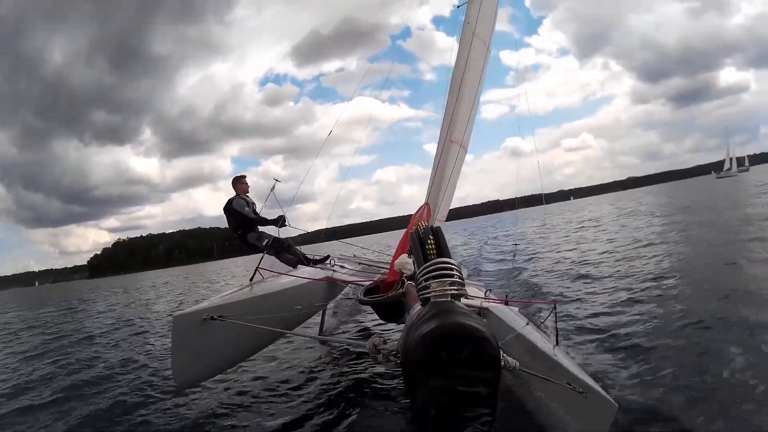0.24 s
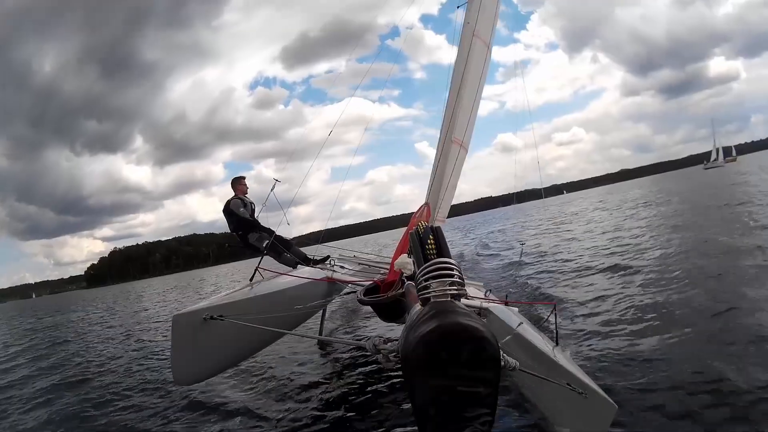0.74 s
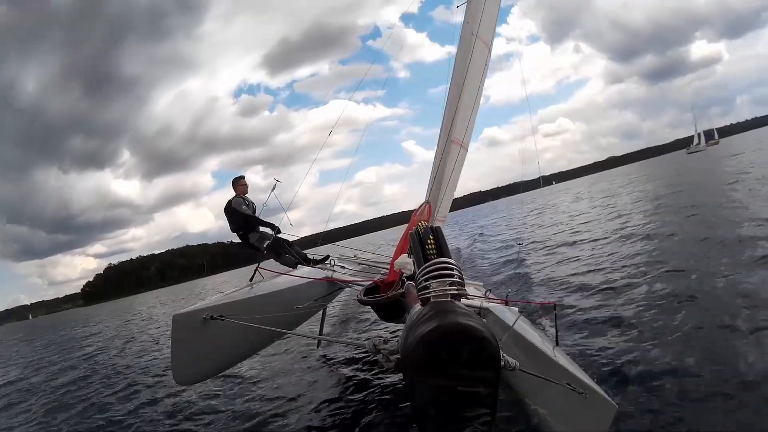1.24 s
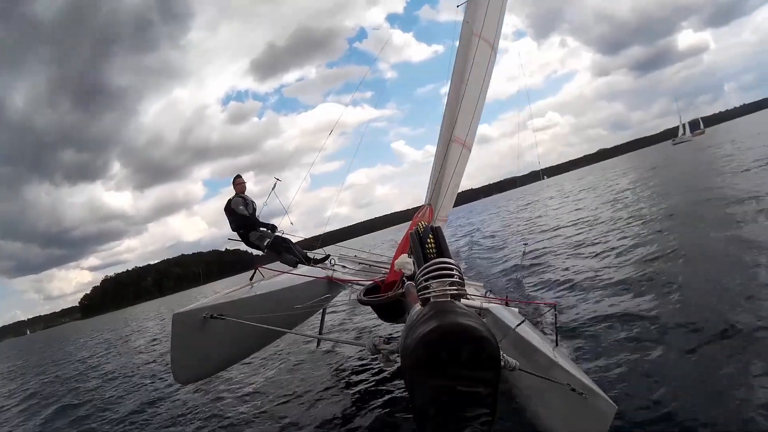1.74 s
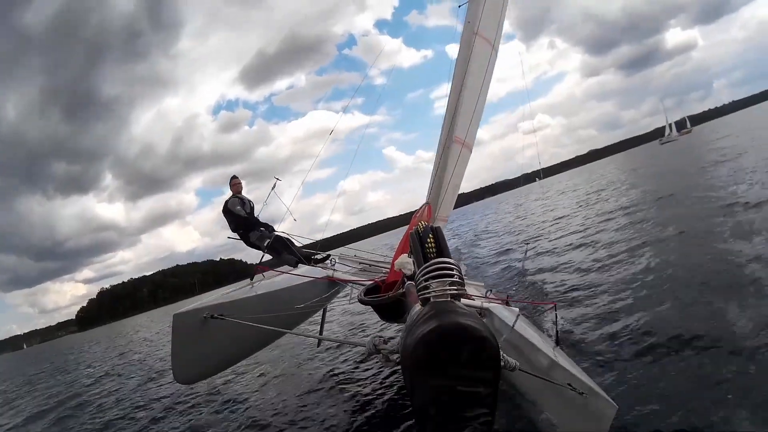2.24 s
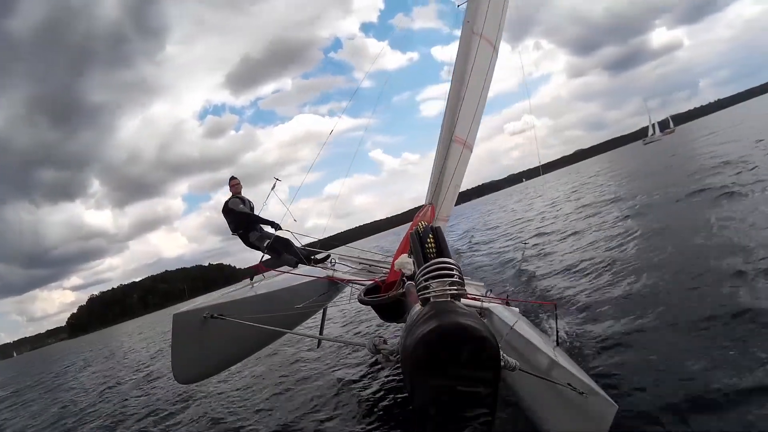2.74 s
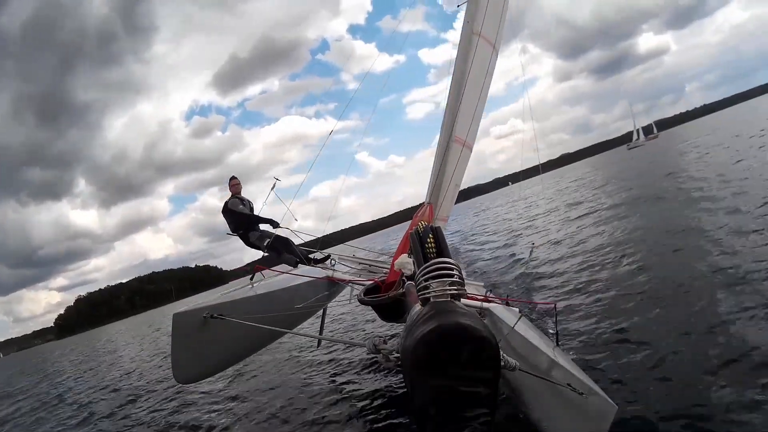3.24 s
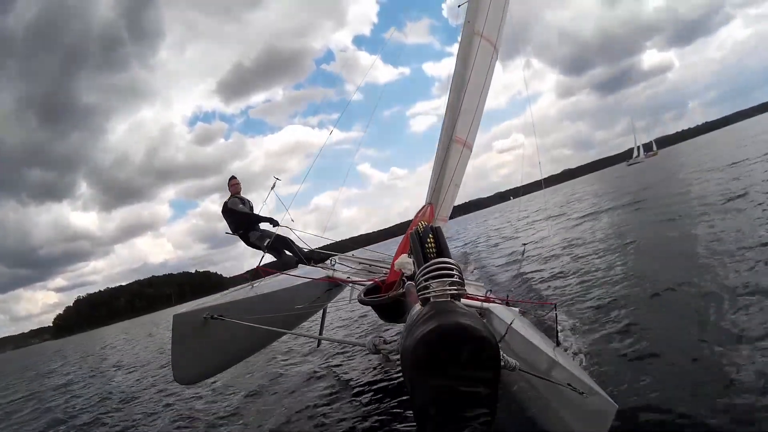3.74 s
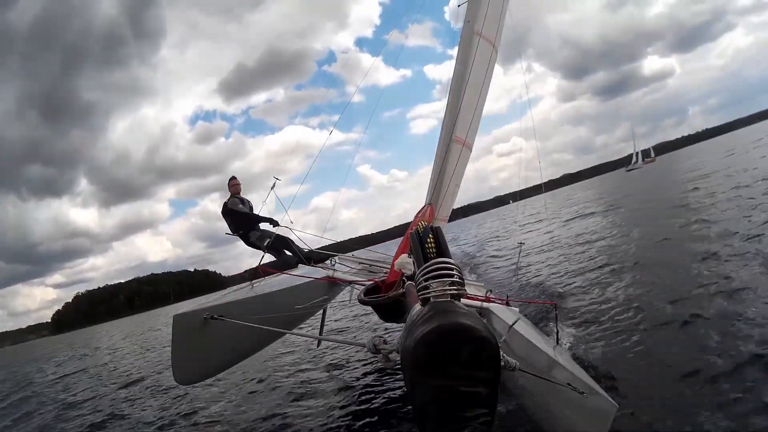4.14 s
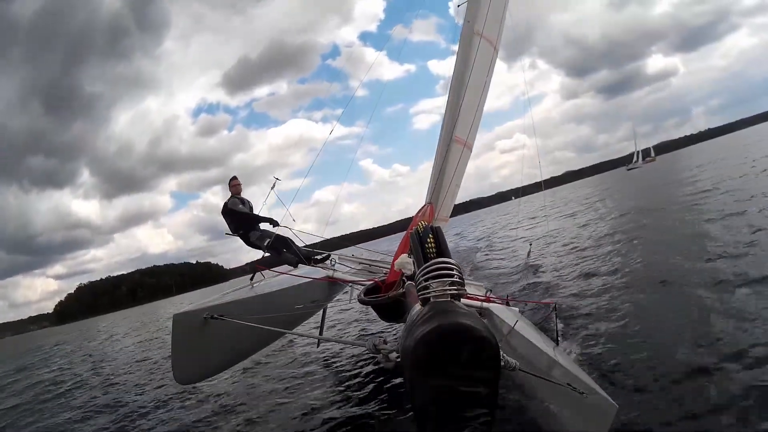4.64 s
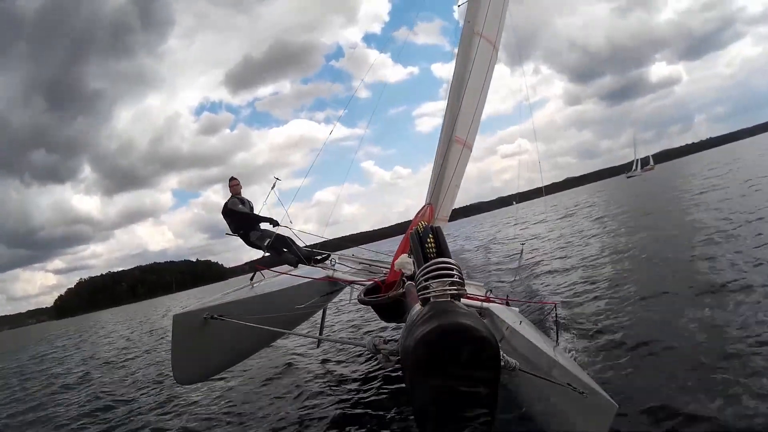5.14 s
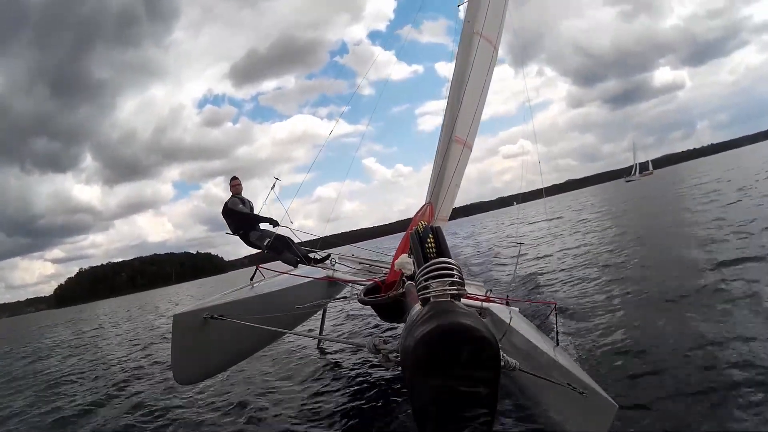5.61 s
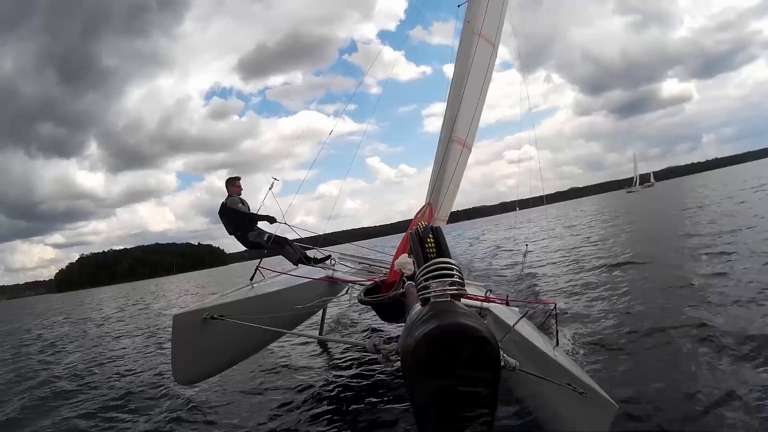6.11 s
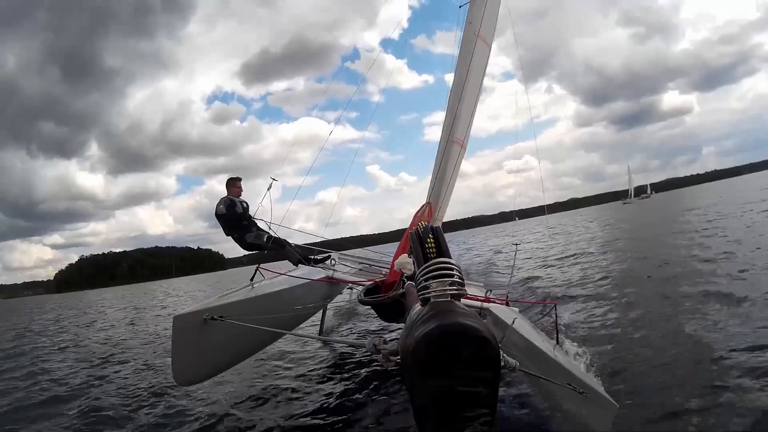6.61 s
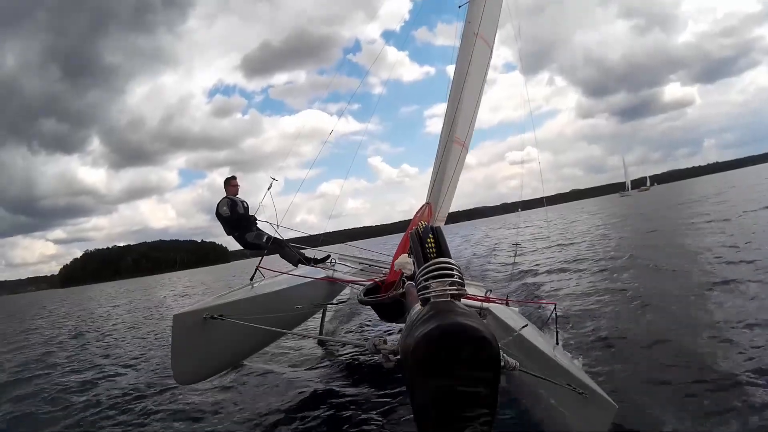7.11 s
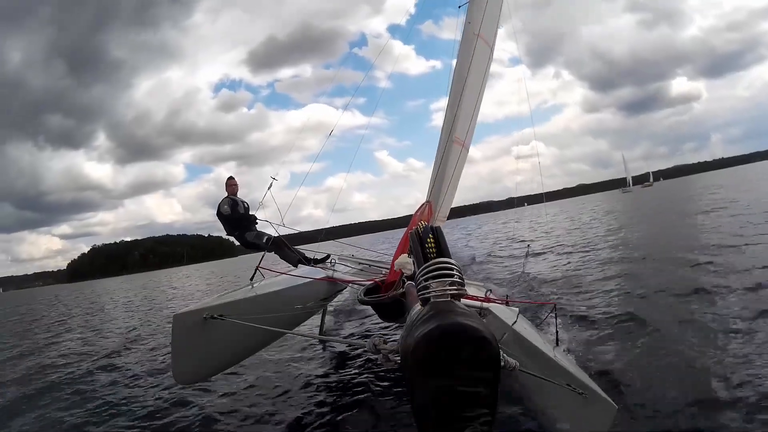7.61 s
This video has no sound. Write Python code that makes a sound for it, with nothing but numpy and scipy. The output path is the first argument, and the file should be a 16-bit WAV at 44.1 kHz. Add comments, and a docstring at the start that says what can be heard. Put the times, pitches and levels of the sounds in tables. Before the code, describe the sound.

Water washes, bubbles and slaps along the hollow hulls of a catamaran on a lake, over the low, gusting hum of its frame. In the first two seconds a ratchet block clicks, fittings knock, a rope jerks and creaks, and two faint high digital ticks sound. Then small waves carry on, with two more knocks near the end. Everything is muffled by a waterproof camera case at the bow and heard only on the left.

```python
"""On a lake, at the bow pole of a heeling catamaran, heard from inside a waterproof camera case.
Water washes, bubbles and slaps along the hollow hulls over the low hum of the wind-loaded frame.
As the sheet is worked a ratchet block clicks, fittings knock, and the rope jerks and creaks.
The recorder glitches with two faint high ticks; the case muffles the treble above about 1.7 kHz.
Only the left channel is live."""
import sys
import numpy as np
from scipy import signal
from scipy.fft import rfft, irfft
from scipy.io import wavfile
from scipy.ndimage import uniform_filter1d

SR = 44100
rng = np.random.default_rng(int(sys.argv[2]) if len(sys.argv) > 2 else 0)


def log_audio(samples):
    """Write samples as a 16-bit WAV file to the path given in sys.argv[1]."""
    # one column per channel
    frames = np.atleast_2d(samples).T
    # limit to full scale, then quantise
    limited = np.clip(frames, -1, 1)
    pcm = np.round(limited * 32767).astype(np.int16)
    wavfile.write(sys.argv[1], SR, pcm)


N = 346626
T = np.arange(N) / SR

# steady flow along the hulls: time_s, level_db
STEADY_FLOW = [(0, -55), (2.3, -56), (3.25, -58.5), (5.0, -58.5), (6.0, -57), (7.86, -58)]
# wavelets hitting a hull: start_s, splash_db, gulp_db, length_s
WAVELETS = [(0.305, -55, -43, 0.014), (0.744, -53.5, -63, .019), (0.824, -59, -43, 0.012),
            (1.295, -49, -35, .009), (1.948, -48.5, -56, .018), (2.074, -49.5, -35.5, 0.029),
            (2.256, -46, -49, 0.025), (2.785, -63, -42.5, 0.011), (2.936, -47.5, -44, 0.027),
            (3.437, -49, -45, 0.021), (3.54, -44.5, -54, 0.023), (3.597, -49.5, -46, 0.033),
            (3.833, -55.5, -50, 0.028), (3.974, -49, -46, 0.016), (4.266, -53.5, -48.5, 0.045),
            (4.473, -48, -34.5, 0.022), (5.069, -56, -46.5, .015), (5.728, -52.5, -45.5, 0.03),
            (6.206, -52.5, -37.5, .014), (6.301, -45, -37, 0.035), (6.486, -57, -37.5, 0.036),
            (6.821, -48, -43, 0.025), (6.966, -47, -40.5, 0.015), (7.081, -56, -40.5, 0.024)]
# resonances of hull cavity, hull skin, fittings, ratchet block: freq_hz, width_hz, gain_db
HULL_MODES = [(252, 92, -12.5), (288.3, 34.7, -9.5), (358, 21.7, 1.5), (410.6, 87, -7.5), (554.4, 58, -7),
              (614.4, 59, -10.5), (704, 35, -8), (818, 160, -23.5)]
SKIN_MODES = [(843, 150, -8.5), (1038, 73, -2), (1230, 145, -4.5), (1404, 60, 2.5), (1478, 77, -1.5),
              (1698, 114, -2.5), (2113, 99, -6), (2390, 124, -13.5), (3110, 120, -18), (3820, 240, -27)]
FITTING_MODES = [(204, 12, -11), (372, 49.5, 0), (561, 9.1, -1), (742, 41, 1.5), (884, 20, -3.5),
                 (1019, 73, -4.5), (1223, 61, -1.5), (1392, 64, -4), (1592, 97, -6), (2145, 230, -7),
                 (2380, 84, -8.5), (2530, 75, -13), (2993, 77, -10.5), (3614, 120, -13), (3680, 85, -17),
                 (3950, 160, -12.5)]
BLOCK_MODES = [(57, 26, -7.5), (370, 140, -23), (531, 30, -4), (756, 91, -12.5), (1080, 62, -12.5),
               (1197, 47, -9.5), (1440, 77, -3.5), (1637, 105, -1.5), (1690, 284, -5.5), (2020, 160, -18),
               (2273, 67, -5.5), (3040, 190, -14.5), (3520, 270, -15.5), (3990, 83, -23.5),
               (4500, 220, -9.5)]


def undb(db):
    """Decibels to gain."""
    return 10 ** (np.asarray(db) / 20)


def unit(x):
    """Scale to rms 1."""
    return x / np.std(x)


def add(out, start_s, x):
    """Mix x in at start_s."""
    i = max(int(start_s * SR), 0)
    out[i:i + len(x)] += x[:max(N - i, 0)]


def through(x, response):
    """Pass x through an impulse response."""
    return signal.fftconvolve(x, response)[:len(x)]


def ring(modes):
    """Impulse response of damped modes; far from the blow, neighbours swing in opposite senses."""
    t = T[:SR // 4]
    hz, width_hz, db = np.transpose(modes)[:, :, None]
    sense = (-1) ** np.arange(len(modes))[:, None]
    envelope = undb(db) * width_hz * np.exp(-np.pi * width_hz * t)
    return np.sum(sense * envelope * np.sin(2 * np.pi * hz * t), axis=0)


def colour(x, points, size=4096):
    """Minimum-phase filter through (freq_hz, gain_db) points."""
    hz, db = np.transpose(points)
    bins_hz = np.arange(size // 2 + 1) * SR / size
    gain = undb(np.interp(np.log(bins_hz + 1), np.log(hz), db))
    cepstrum = irfft(np.log(gain))
    cepstrum[1:size // 2] *= 2
    cepstrum[size // 2 + 1:] = 0
    return through(x, irfft(np.exp(rfft(cepstrum))))


def walk(rate_hz):
    """Slewed random steps, rms near 1."""
    hold = int(SR / rate_hz)
    steps = np.repeat(rng.standard_normal(N // hold + 1), hold)
    return unit(uniform_filter1d(steps, hold)[:N])


def patter(response, rate_hz, spread_db, even_s):
    """Dense random impacts on a resonator, levelled to rms 1 over even_s."""
    sizes = undb(spread_db * np.minimum(rng.exponential(size=N), 4))
    impacts = (rng.random(N) < rate_hz / SR) * sizes * rng.choice([-1, 1], N)
    return steady(through(impacts, response), even_s)


def steady(x, even_s):
    """Even out slow swells, keeping the fine grain; rms near 1."""
    return x / np.sqrt(uniform_filter1d(x ** 2, int(even_s * SR)) + 1e-18)


def swell(length_s):
    """Envelope that peaks at half of length_s and ebbs."""
    age = T[:SR // 3] / (length_s / 2)
    return age * np.exp(1 - age)


def wavering(pitch_hz):
    """Tone unsteady in pitch and level."""
    cycles = np.cumsum(pitch_hz * (1 + 0.03 * walk(160))) / SR
    return np.sin(2 * np.pi * cycles) * undb(1.2 * walk(130))


def strikes(events, modes, gain_db, bounce_s, bounce_db, rattle_s):
    """Blows into modes: hard contact, one bounce, brief chatter as the part seats."""
    out, t, response = np.zeros(N), T[:SR // 8], ring(modes)
    crest_factor = 10
    for start_s, level_db in events:
        chatter = rng.standard_normal(len(t)) * np.exp(-t / rattle_s)
        contact = chatter / np.linalg.norm(chatter)
        contact[0] += 1
        contact[int(bounce_s * SR)] += undb(bounce_db)
        blow = unit(through(contact, response)) / crest_factor
        add(out, start_s, undb(level_db + gain_db) * blow)
    return out


def humps_db(events):
    """Bell-shaped rise around each event."""
    return sum(db * np.exp(-((T - peak_s) / half_s) ** 2) for peak_s, db, half_s in events)


def flow_db():
    """Steady flow level, easing as the boat slows."""
    return np.interp(T, *np.transpose(STEADY_FLOW))


def waves_db():
    """Lift from waves running along the hulls."""
    # crest_s, rise_db, half_length_s
    waves = [(0.02, 10.5, 0.052), (1.52, 8.5, 0.21), (2.02, 3.5, 0.13), (2.93, 6, 0.11), (3.63, 8, 0.082),
             (4.0, 4, 0.1), (4.55, 4, 0.093), (5.22, 4.5, 0.039), (5.52, 3.5, 0.086), (6.43, 9, .16),
             (6.95, 7.5, 0.3), (7.82, 2.5, 0.059)]
    return humps_db(waves)


def ripples_db(rise_db=4.5, length_s=0.024, count=48):
    """Quick lifts from ripples lapping at uneven intervals; mean 0."""
    lift_db = np.zeros(N)
    for k, (late, size) in enumerate(rng.random((count, 2))):
        add(lift_db, (k + late) / count * T[-1], rise_db * size * swell(length_s))
    return lift_db - lift_db.mean()


def wash():
    """Churning water drums on the hollow hull; finer spray patters on its skin."""
    level_db = flow_db() + 1.02 * walk(35) + ripples_db()
    body = patter(ring(HULL_MODES), rate_hz=2500, spread_db=3.5, even_s=0.16)
    spray = patter(ring(SKIN_MODES), rate_hz=2200, spread_db=2.5, even_s=0.38)
    body_db = level_db + waves_db() + 0.93
    spray_db = level_db + 0.73 * waves_db() - 4
    return body * undb(body_db) + spray * undb(spray_db)


def bubbles(low_hz=450, high_hz=1700, decay_cycles=9, rise=0.062, spread_db=3, count=200):
    """Air folded under the bow wave rings briefly, rising in pitch."""
    out, t = np.zeros(N), T[:SR // 10]
    for when, pitch, size in rng.random((count, 3)):
        pitch_hz = low_hz * (high_hz / low_hz) ** pitch
        age = t * pitch_hz / decay_cycles
        cycles = np.cumsum(pitch_hz * (1 + rise * np.minimum(age, 2))) / SR
        envelope = undb(spread_db * np.log(size + 0.02)) * np.exp(-age)
        add(out, when * T[-1], envelope * np.sin(2 * np.pi * cycles))
    return out * undb(flow_db() + waves_db())


def frame_hum(gain_db=-0.5):
    """Wind-loaded frame and rig shudder in their lowest modes, more with speed and in gusts."""
    # freq_hz, width_hz, gain_db
    frame_modes = [(41.3, 14, -18), (53.9, 10, 5.5), (116.6, 54, -11), (177, 390, -18.5)]
    # peak_s, rise_db, half_length_s
    gusts = [(1.0, 5.5, 0.13), (1.37, 13, 0.066), (1.65, 14, 0.26), (2.12, 3.5, .12), (3.05, 5.5, 0.075),
             (3.75, 7, 0.085), (4.42, 3.5, 0.17), (4.88, 3, 0.088), (6.34, 11, 0.21), (6.9, 7, 0.14),
             (7.27, 4, 0.076), (7.78, 5.5, 0.11)]
    shudder = steady(through(rng.standard_normal(N), ring(frame_modes)), even_s=0.079)
    return shudder * undb(flow_db() + humps_db(gusts) + gain_db)


def fitting_knocks():
    """Fittings knock on the frame as the load shifts."""
    # start_s, level_db
    knocks = [(0.015, -25), (1.196, -25.5), (1.347, -29), (1.628, -30), (6.385, -25), (6.458, -23.5)]
    return strikes(knocks, FITTING_MODES, gain_db=5.5, bounce_s=0.003, bounce_db=-36, rattle_s=0.0073)


def ratchet_clicks():
    """The pawl strikes and rings the ratchet block."""
    # start_s, level_db
    clicks = [(0.219, -29.5), (0.343, -28.5), (0.460, -33), (0.584, -33.5), (1.458, -27), (1.478, -33),
              (1.549, -30), (1.588, -23), (1.773, -32.5), (1.779, -32.5), (1.924, -27.5), (2.114, -35.5),
              (3.935, -42), (5.867, -39), (5.987, -40)]
    return strikes(clicks, BLOCK_MODES, gain_db=2.5, bounce_s=0.002833, bounce_db=-4, rattle_s=0.0051)


def slaps(gain_db=-2, boom_db=-5):
    """Each wavelet splashes against the hull, which booms under it."""
    push = np.zeros(N)
    for start_s, splash_db, _, length_s in WAVELETS:
        add(push, start_s, undb(splash_db + gain_db) * swell(length_s))
    boom = patter(ring(HULL_MODES), rate_hz=1800, spread_db=2, even_s=0.04)
    splash = patter(ring(SKIN_MODES), rate_hz=1500, spread_db=3.5, even_s=0.04)
    return push * (undb(boom_db) * boom + splash)


def gulps(pitch_hz=367.8, delay_s=0.0073, stretch=1.39, gain_db=-2.5):
    """Air trapped by each slap rings at the hull's hollow note, wavering as water squeezes it."""
    push = np.zeros(N)
    for start_s, _, gulp_db, length_s in WAVELETS:
        add(push, start_s + delay_s, undb(gulp_db + gain_db) * swell(stretch * length_s))
    return push * wavering(pitch_hz)


def glitch_ticks(decay_s=0.0011, highpass_hz=5000):
    """Two faint, sharp, high-pitched digital ticks from the recorder."""
    # start_s, level_db
    ticks = [(1.202, -15), (1.834, -23)]
    out, t = np.zeros(N), T[:SR // 50]
    for start_s, level_db in ticks:
        add(out, start_s, undb(level_db) * rng.standard_normal(len(t)) * np.exp(-t / decay_s))
    return signal.sosfilt(signal.butter(6, highpass_hz, "high", fs=SR, output="sos"), out)


def rope_snaps():
    """The taut rope jerks in its lead."""
    # start_s, level_db
    snaps = [(1.372, -24), (1.387, -21.5), (1.505, -28), (1.833, -22.5)]
    # freq_hz, width_hz, gain_db
    rope_modes = [(377, 17, 3), (490, 37, 8.5), (710, 34, 1.5), (835, 70, 1.5), (1256, 67, -0.5),
                  (1450, 400, -9.5), (1690, 220, 4), (2280, 120, -6), (3920, 180, -12.5), (4680, 140, -1)]
    return strikes(snaps, rope_modes, gain_db=1.5, bounce_s=0.0023, bounce_db=-14, rattle_s=0.002)


def sheet_creaks():
    """The loaded sheet sticks and slips through its lead, shaking fittings and block."""
    # start_s, length_s, level_db
    creaks = [(1.406, 0.046, -35), (1.62, 0.025, -41), (1.659, 0.0255, -40.5), (1.671, 0.034, -37)]
    grip = np.zeros(N)
    for start_s, length_s, level_db in creaks:
        add(grip, start_s, undb(level_db) * signal.windows.tukey(int(length_s * SR), 0.2))
    deck_gear = ring(FITTING_MODES) + ring(BLOCK_MODES)
    return grip * patter(deck_gear, rate_hz=700, spread_db=1.5, even_s=0.012)


def plops(length_s=0.015):
    """Single large bubbles break loose and ring above the gulps' note."""
    # start_s, level_db, pitch_hz
    large_bubbles = [(2.955, -45, 637), (4.574, -45, 712), (6.89, -43, 584), (6.955, -39.5, 584)]
    out = np.zeros(N)
    for start_s, level_db, pitch_hz in large_bubbles:
        envelope = undb(level_db) * swell(length_s)
        add(out, start_s, envelope * wavering(pitch_hz)[:len(envelope)])
    return out


def scene():
    """Deck gear, water and frame, carried through the boat, plus the glitch ticks."""
    deck_gear = ratchet_clicks() + fitting_knocks() + rope_snaps()
    water = wash() + bubbles() + slaps() + plops() + gulps()
    return np.array([deck_gear + water + frame_hum() + sheet_creaks() + glitch_ticks()])


def record(dry, gain_db=6, hiss_db=-72, clock_hz=16000, lowpass_hz=15800):
    """The case muffles, the converter adds a faint mirror image, the microphone hisses; left only."""
    # freq_hz, gain_db
    case_response = [(15, -29), (35, -1), (1500, 1), (1720, -7.5), (1900, -16.5), (2300, -13), (3800, -16),
                     (4300, -34), (6000, -36.5), (16000, -42)]
    # freq_hz, gain_db
    hiss_spectrum = [(100, 12), (2500, 3.5), (5000, -2), (10000, -3.5), (16000, -5.5)]
    inside = undb(gain_db) * colour(dry[0], case_response)
    # mirrored about the converter clock, higher tones most strongly
    image = np.diff(inside, prepend=0) * np.cos(2 * np.pi * clock_hz * T) / 2
    hiss = undb(hiss_db + gain_db) * unit(colour(rng.standard_normal(N), hiss_spectrum))
    lowpass = signal.ellip(10, 0.2, 70, lowpass_hz, fs=SR, output="sos")
    left = signal.sosfilt(lowpass, inside + image + hiss)
    return np.array([left, np.zeros(N)])


dry = scene()
out = record(dry)
log_audio(out)
```